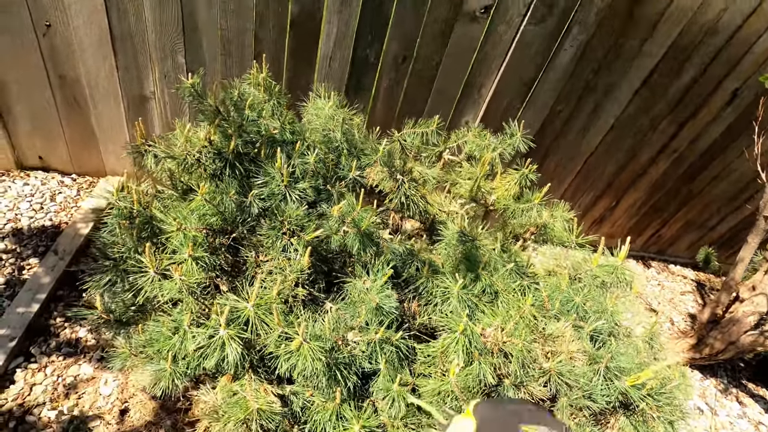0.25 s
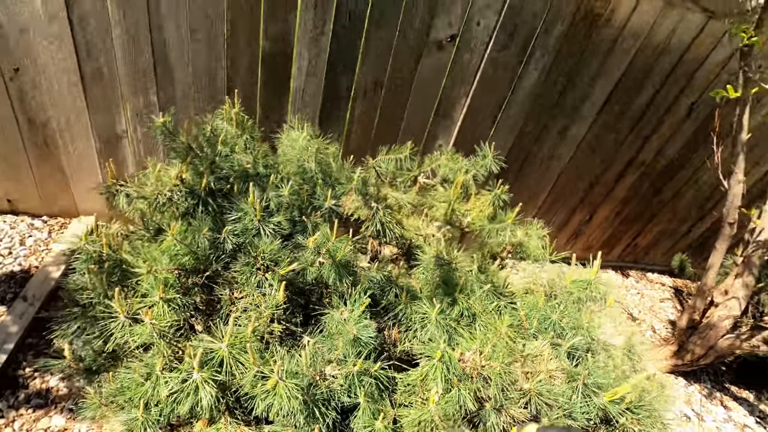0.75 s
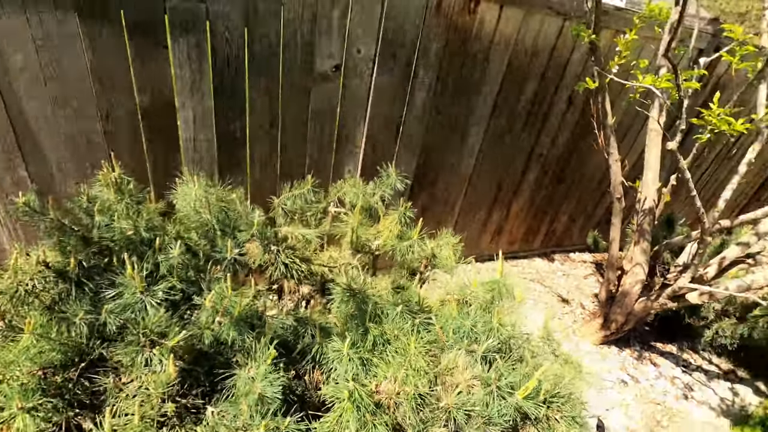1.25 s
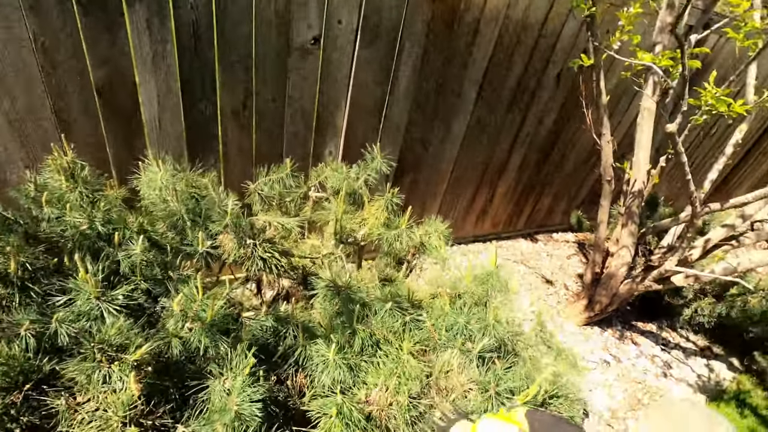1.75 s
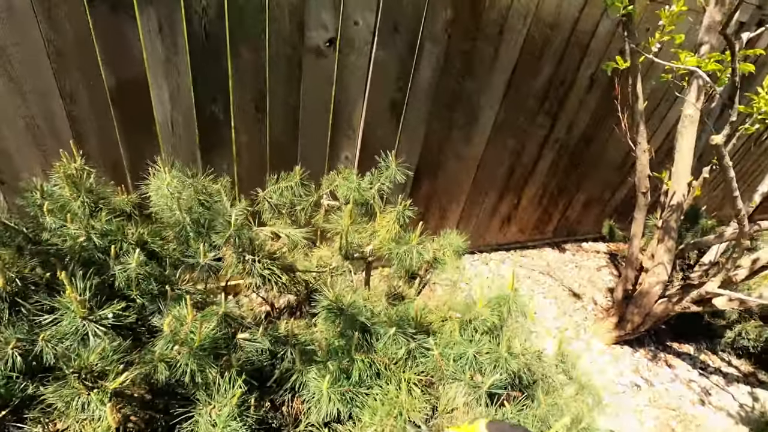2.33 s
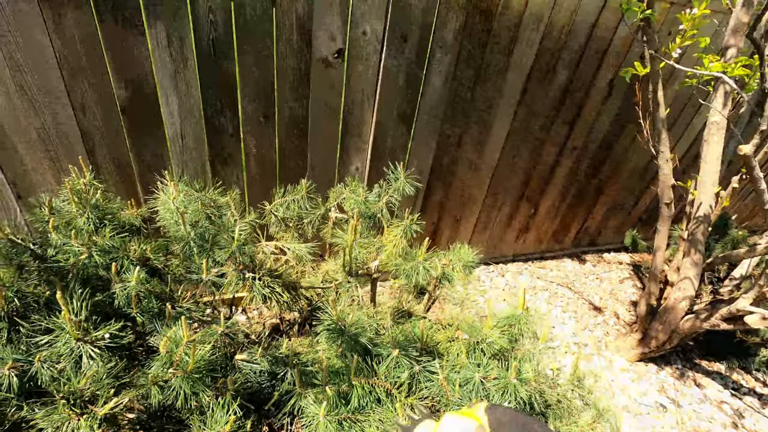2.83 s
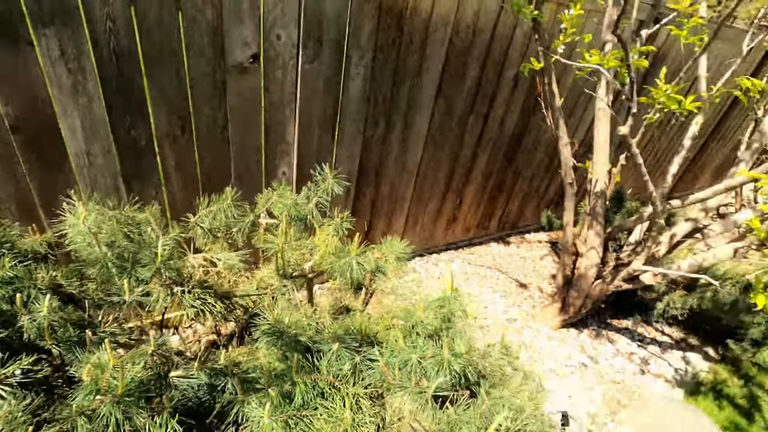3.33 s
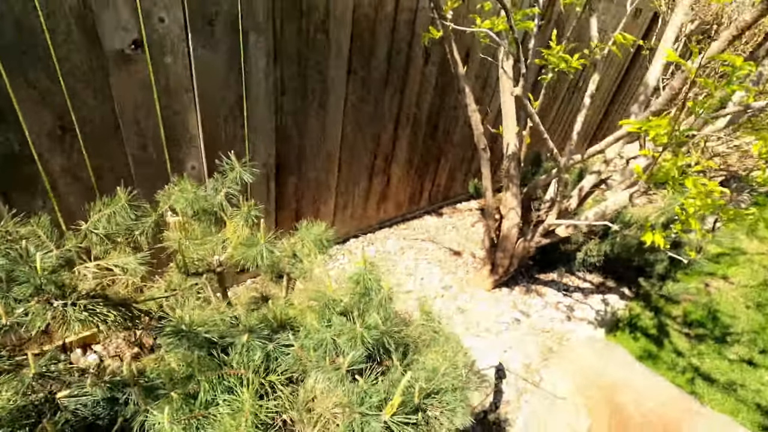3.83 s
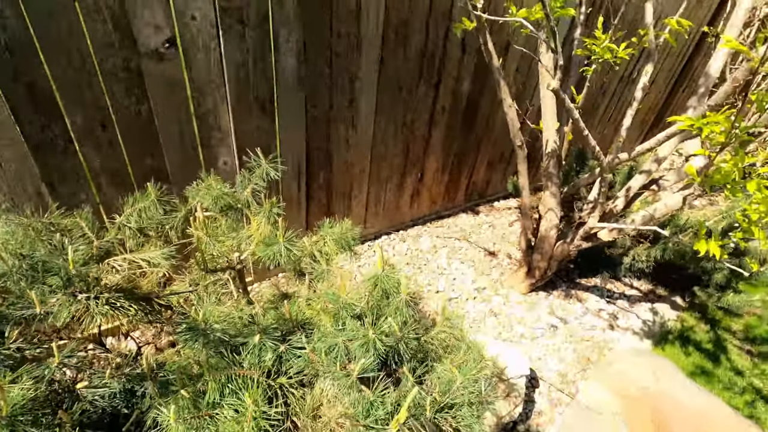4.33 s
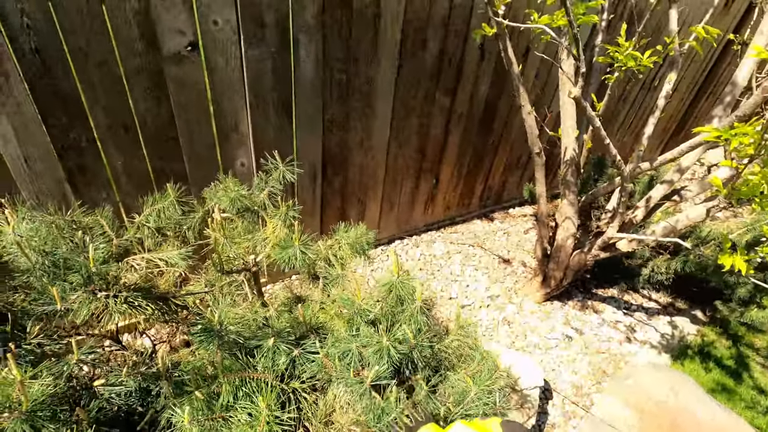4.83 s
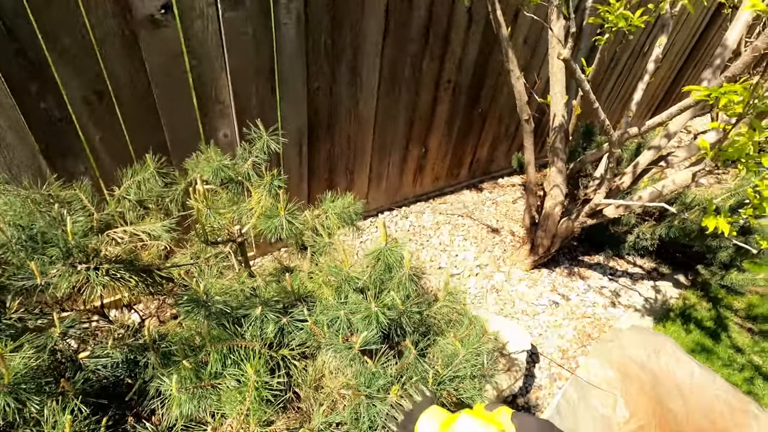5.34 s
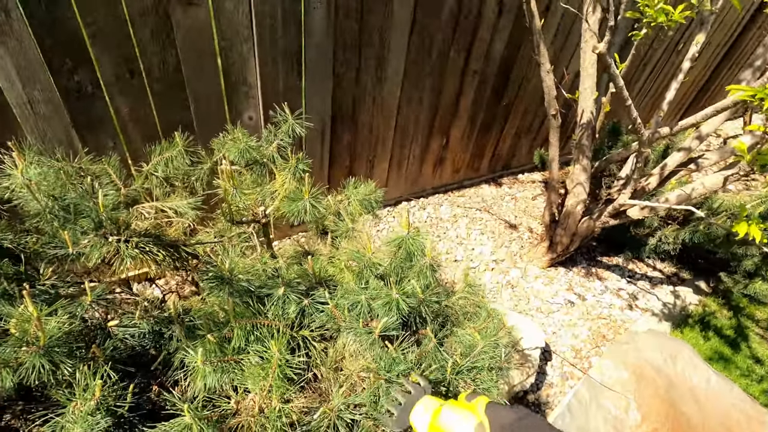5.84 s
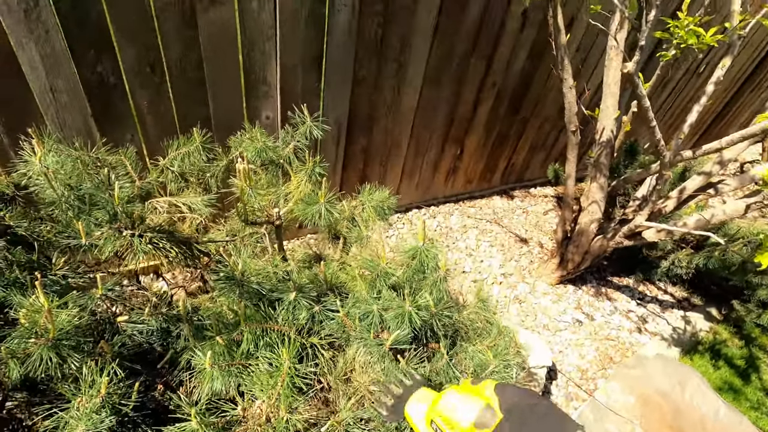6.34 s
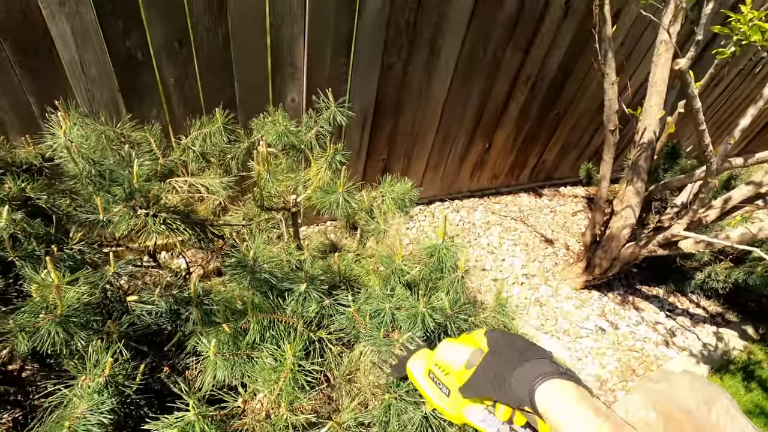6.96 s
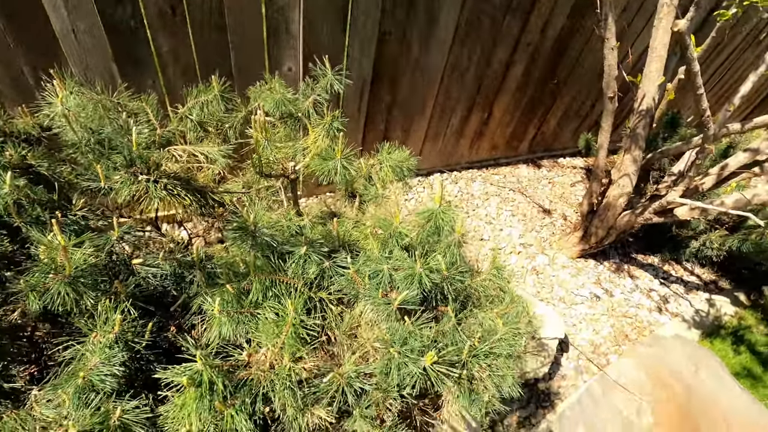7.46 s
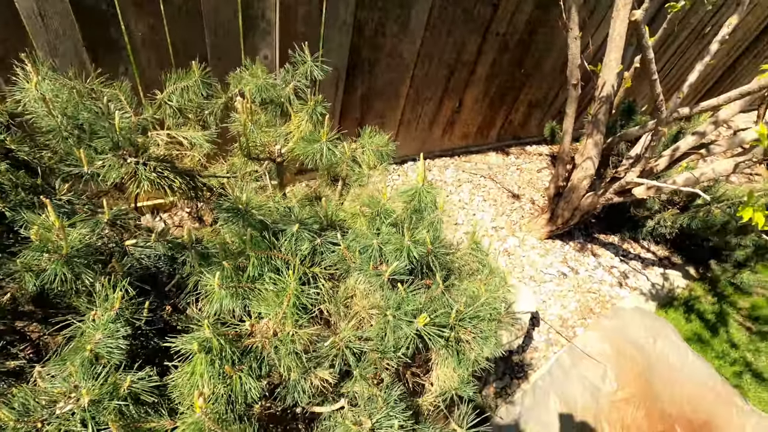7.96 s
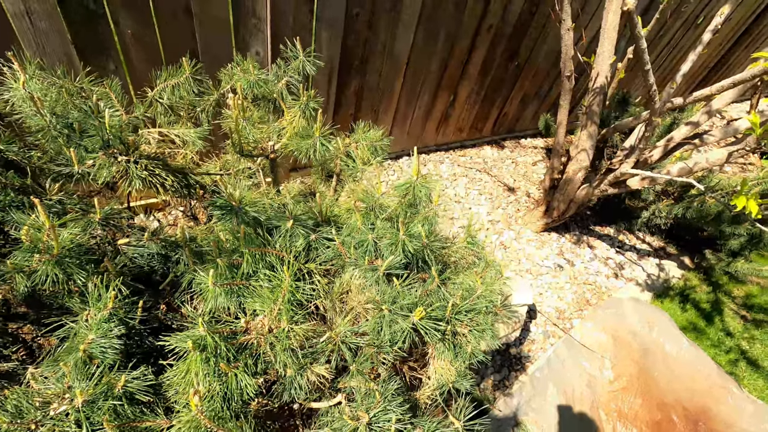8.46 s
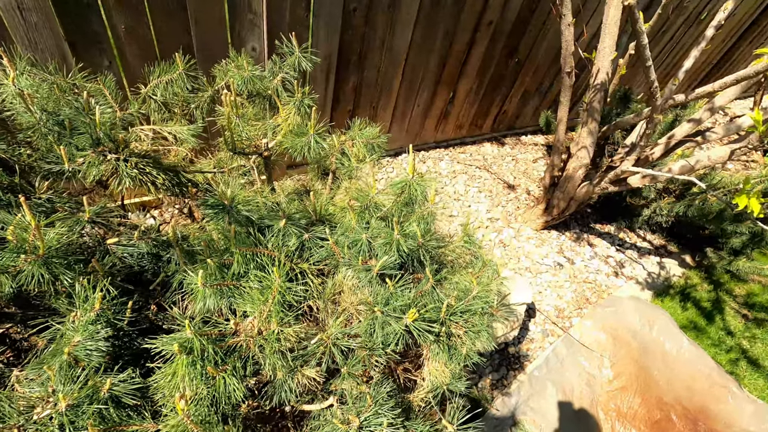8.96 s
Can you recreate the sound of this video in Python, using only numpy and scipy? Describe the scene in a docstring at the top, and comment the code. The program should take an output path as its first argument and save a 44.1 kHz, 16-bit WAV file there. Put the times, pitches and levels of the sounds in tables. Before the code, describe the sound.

Close electric garden shears trim a pine, starting and winding down five times with a buzzing plastic rattle and chattering steel blades.

```python
"""Cordless hedge shears, close to the microphone, trim a dwarf pine beside a wooden fence.
They run in five bursts that each coast to a stop. A small motor turns a crank; gear teeth and play
in the drive rattle the housing, and the blades scrape twice a turn. In the pauses the tool bumps,
needles rustle, and twigs and the trigger click. A dove coos across the garden; a far engine drones."""
import sys
import numpy as np
from scipy import signal
from scipy.fft import rfft, irfft, next_fast_len
from scipy.io import wavfile
from scipy.ndimage import uniform_filter1d

SR = 44100
rng = np.random.default_rng(int(sys.argv[2]) if len(sys.argv) > 2 else 0)


def file_out(sig):
    """Save sig as 16-bit WAV at sys.argv[1]."""
    # one column per channel
    cols = np.atleast_2d(sig).T
    # limit, then scale
    lim = np.clip(cols, -1, 1)
    pcm = np.round(lim * 32767).astype(np.int16)
    wavfile.write(sys.argv[1], SR, pcm)


N = 405719
TIME = np.arange(N) / SR
CRANK_HZ, GEAR_RATIO = 19.6, 15.15  # crank at full speed; motor turns per crank turn

# Spectrum of the steel blades. Each row: frequency in Hz, relative level in dB.
STEEL_SPECTRUM = [(3000, -21.5), (4200, -8), (4900, -3), (5400, -2.5), (6100, 1.5), (6550, -2), (7080, 2),
                  (7550, -8), (8150, -14), (10000, -9.5), (10900, -13), (12000, -18.5), (13200, -38),
                  (15200, -39)]


def undb(db):
    """Decibels to gain."""
    return 10 ** (np.asarray(db) / 20)


def unit(x):
    """Scale to rms 1."""
    return x / np.sqrt(np.mean(x ** 2) + 1e-18)


def running_unit(x, speed):
    """Scale to rms 1 over the time the drive runs above half speed."""
    return x / np.sqrt(np.mean(x[speed > .5] ** 2))


def curves(table):
    """Each column after the first (seconds) as a control over time."""
    times, *columns = np.transpose(table)
    return [np.interp(TIME, times, column) for column in columns]


def on_axis(points, hz):
    """Read (Hz, value) points on a log-frequency axis."""
    point_hz, value = np.transpose(points)
    return np.interp(np.log(hz + 1), np.log(point_hz), value)


def colour(x, points, resonances=(), size=4096):
    """Causal filter with the given (Hz, dB) spectrum, plus (Hz, dB, relative breadth) resonances."""
    hz = np.fft.rfftfreq(size, 1 / SR)
    peaks_db = sum(db * np.exp(-(np.log((hz + 1) / f) / breadth) ** 2) for f, db, breadth in resonances)
    cepstrum = irfft(np.log(undb(on_axis(points, hz) + peaks_db)))
    cepstrum[1:size // 2] *= 2  # fold to minimum phase
    cepstrum[size // 2 + 1:] = 0
    return signal.fftconvolve(x, irfft(np.exp(rfft(cepstrum))))[:N]


def mode(x, hz, width_hz):
    """One damped resonance."""
    return signal.lfilter(*signal.iirpeak(hz, hz / width_hz, SR), x)


def walk(rate):
    """Smooth random drift with spread 1, turning about rate times a second."""
    hold = max(int(SR / rate), 1)
    steps = np.repeat(rng.standard_normal(N // hold + 1), hold)
    return unit(uniform_filter1d(steps, hold)[:N])


def impulses(times, sizes):
    """Clicks at the given times, each shared between two samples."""
    place = np.clip(times * SR, 0, N)
    i, part = place.astype(int), place % 1
    return (np.bincount(i, sizes * (1 - part), N + 2) + np.bincount(i + 1, sizes * part, N + 2))[:N]


def grains(rate, spread_db):
    """Random tiny contacts of uneven size, about rate a second; the largest are bounded."""
    size = np.minimum(rng.standard_normal(N), 2.3)
    return (rng.random(N) < rate / SR) * rng.choice([-1, 1], N) * undb(spread_db * size)


def crank(on, off, stroke_s, coast_s, spin_up_s=.028, snag_s=6.42, snag_width_s=.05):
    """Speed (share of full) and turns: a quick spin-up, then after release friction slows the drive."""
    spin_up = 1 - np.exp(-np.maximum(TIME - on, 0) / spin_up_s)
    run_down = np.clip(1 - (TIME - off) / coast_s, 0, 1)
    snag = 1 - .14 * np.exp(-((TIME - snag_s) / snag_width_s) ** 2)
    speed = spin_up * run_down * snag
    turns = np.cumsum(speed) * CRANK_HZ / SR
    return speed, turns - np.interp(stroke_s, TIME, turns)


def effort(on, off, speed, run_db, rub_db, easing_db_per_s, bounce_speed=.51, db_per_halving=4):
    """Tool level and relative scrape in dB: a kick, a steady run, then both fall with the speed."""
    age = np.maximum(TIME - on, 0)
    kick_db = 5.5 * np.exp(-age / .067)  # the starting torque slams the gears
    coasting = np.where(TIME > off, np.maximum(speed, 1e-3), 1)
    # below bounce_speed the loose parts stop bouncing and the rattle dies
    bounce_db = -10 * np.log10(1 + (bounce_speed / coasting) ** 4.33)
    eased_db = easing_db_per_s * np.minimum(age, off - on)
    scrape_db = rub_db - kick_db - eased_db + db_per_halving * np.log2(coasting)
    return run_db + kick_db + bounce_db, scrape_db


def teeth(turns, jitter_ms=.11, scatter_db=3.0, count=91):
    """Each tooth knocks in its own way, nearly the same on every turn."""
    strength = rng.choice([-1, 1], count) * rng.uniform(.35, 1, count)
    offset = rng.random(count)
    tooth = np.arange(np.ceil(turns[0] * count), turns[-1] * count).astype(int)
    late, size = rng.standard_normal((N // 100, 2))[tooth].T
    times = np.interp((tooth + offset[tooth % count]) / count, turns, TIME)
    return impulses(times + late * jitter_ms / 1000, strength[tooth % count] * undb(scatter_db * size))


def buzz(x, t60):
    """After each contact the loose parts go on chattering briefly."""
    keep = np.exp(-2 * np.log(1000) / (t60 * SR))
    energy = signal.lfilter([1 - keep], [1, -keep], x ** 2)
    return np.sqrt(energy) * rng.standard_normal(N)


def drive_hits(speed, turns, loose_db=-5):
    """Gear teeth and loose parts strike as the drive takes up its play just ahead of each stroke."""
    angle = 2 * np.pi * turns
    stroke_db = .87 * np.cos(2 * angle + .37) + .89 * np.cos(angle + .84)
    shake_db = .99 * np.cos(GEAR_RATIO * angle) + .37 * walk(30)  # the motor shakes the drive
    gears = running_unit(teeth(turns), speed)
    loose = undb(loose_db) * running_unit(grains(4000 * speed, 2.2), speed)
    hits = (gears + loose) * undb((stroke_db + shake_db) * speed)
    return hits + .45 * buzz(hits, t60=.02)


def housing_rattle(hits, speed, resonances, soft_hz=3900):
    """The hits ring the plastic housing; slower contacts are softer, so the rattle dulls."""
    # Spectrum of the housing. Each row: frequency in Hz, relative level in dB.
    plastic_spectrum = [(250, -39.5), (450, -18.5), (600, -13), (780, -18), (950, -10), (1100, -8.5),
                        (1400, -5.5), (1650, -5), (1950, -9.5), (2350, -5), (3000, -7), (3600, -7),
                        (4300, -9.5), (5200, -19), (8000, -36)]
    rattle = running_unit(colour(hits, plastic_spectrum, resonances), speed)
    dull = signal.sosfiltfilt(signal.butter(4, soft_hz, fs=SR, output="sos"), rattle)
    rattle = dull + speed ** 2 * (rattle - dull)
    gear_case = mode(rattle, 2970, 370)  # its steel goes on ringing as the drive coasts
    return rattle * (1 - .043 * (1 - speed)) + .81 * (1 - speed) * gear_case


def drive_knock(hits, speed, knock_db=-22, slack_db=9):
    """The low knock of the hits stands out more as the drive slows and goes slack."""
    # Spectrum of the knock. Each row: frequency in Hz, relative level in dB.
    knock_spectrum = [(60, -34.5), (140, -17.5), (230, -10), (330, 1), (430, 1.5), (600, -4), (1200, -50)]
    return running_unit(colour(hits, knock_spectrum), speed) * undb(knock_db + slack_db * (1 - speed))


def blades(speed, turns, resonance, pattern_db=-2, ring_db=-7.5):
    """Teeth sliding over each other: a repeating chatter, loose grit and ringing steel."""
    # Parts of the blade that ring when a tooth catches.
    # Each row: frequency in Hz, width in Hz, relative level in dB.
    blade_modes = [(4920, 150, -4), (5800, 1200, -12), (7120, 570, -3), (9980, 490, -8.5),
                   (11900, 640, -14.5)]
    angle = 2 * np.pi * turns
    # they rub hardest in mid-stroke, forward more than back, and chatter eight times a turn
    stroke_db = 2.5 * np.cos(2 * angle) + .99 * np.cos(angle) + 1.35 * np.cos(3 * angle)
    chatter_db = 2.7 * np.cos(8 * angle) + .21 * walk(170)
    pressure = undb(speed * (stroke_db + chatter_db))
    grit = running_unit(grains(7000 * speed ** 2 + 250 * speed, 4.8), speed)
    pattern = undb(pattern_db) * running_unit(teeth(turns, count=32), speed)
    rubs = pressure * (grit + pattern)
    rubs = rubs + .82 * buzz(rubs, t60=.0033)
    scrape = running_unit(colour(rubs, STEEL_SPECTRUM, [resonance]), speed)
    rings = np.zeros(N)
    for hz, width_hz, db in blade_modes:
        catches = pressure * grains(1100 * speed, 4.0)
        rings += undb(db) * running_unit(mode(catches, hz, width_hz), speed)
    return running_unit(scrape + undb(ring_db) * rings, speed)


def motor_hum(speed, turns, motor_db=-26, wobble_rad=.029):
    """The uneven load makes the shaft wobble, which roughens the tones of the drive."""
    # Tones of the drive. Each row: multiple of the crank rate, relative level in dB.
    drive_tones = [(GEAR_RATIO, 0), (GEAR_RATIO + 2, -7), (26, -9), (50, -5), (58, -6)]
    shaft = 2 * np.pi * turns + wobble_rad * walk(25)
    hum = sum(undb(db + 2 * walk(9.8)) * np.sin(multiple * shaft) for multiple, db in drive_tones)
    return undb(motor_db) * np.sqrt(2) * speed ** 4 * hum


def burst(pull, grip):
    """One pull of the trigger: housing rattle, knock, blade scrape and motor hum."""
    on, off, stroke_s, coast_s, run_db, rub_db, easing_db_per_s = pull
    low, high, narrow, steel = np.reshape(grip, (-1, 2))
    speed, turns = crank(on, off, stroke_s, coast_s)
    level_db, scrape_db = effort(on, off, speed, run_db, rub_db, easing_db_per_s)
    hits = drive_hits(speed, turns)
    rattle = housing_rattle(hits, speed, [(*low, .13), (*high, .13), (*narrow, .06)])
    scrape = blades(speed, turns, (*steel, .11)) * undb(scrape_db)
    contacts = rattle + drive_knock(hits, speed) + scrape
    # a slow drive makes fewer contacts, each standing out more
    sparse_gain = np.where(TIME > off, 1 / np.sqrt(np.maximum(speed, .12)), 1)
    return (sparse_gain * contacts + motor_hum(speed, turns)) * undb(level_db)


def shears():
    """Five bursts at close range, each coloured by the way the tool is held."""
    # Trigger pulls. Each row: pull, release, moment of one forward stroke and coasting time in
    # seconds, running level in dB, scrape relative to it in dB, easing of the scrape in dB a second.
    pulls = [(-.2, .68, 0.023, .615, -18, -7.5, 1.6), (1.485, 3.142, 1.616, 0.68, -17.5, -5, 1.5),
             (3.675, 5.091, 3.78, .7, -18, -5, 0.5), (5.739, 7.039, 5.8372, .68, -18, -2.5, 4),
             (7.773, 9.3, 8.26, .66, -17.5, -5, 0.8)]
    # Resonances shifted by the grip, a row per burst. Each row: frequency in Hz and gain in dB for
    # the housing's low resonance, its high one, one narrow band and the blade ring.
    grips = [(1240, 7, 2920, 4.5, 1780, -2.5, 7400, 5), (1270, 5.5, 2910, 4, 1900, -3.5, 7300, 4.5),
             (1296, 5.5, 2970, 3.5, 2900, 1, 7100, 3.5), (1240, 4.5, 2750, 4.5, 984, 4, 4900, 4),
             (1580, 3.5, 3070, 3, 2670, -2, 7620, 9)]
    return sum(burst(pull, grip) for pull, grip in zip(pulls, grips))


def far_engine(tone_db=-.5, rumble_db=-52, rumble_follows=.36):
    """An engine wavers in the distance; its rumble swells less than its tone."""
    # Pitch of the drone. Each row: time in seconds, firing rate in Hz.
    firing_rates = [(0.0, 78.5), (0.51, 86.2), (1.02, 69.7), (1.46, 72.0), (2.87, 60.5), (6.71, 85.9),
                    (7.58, 84.8), (8.02, 72.9), (9.2, 70.2)]
    # Swell of the drone. Each row: time in seconds, level in dB.
    swells = [(0, -43), (.2, -57), (.45, -51), (.9, -66), (2.6, -65), (3.2, -50), (4.8, -47), (5.45, -60),
              (6.25, -41.5), (7.6, -45.5), (8, -60), (8.55, -60), (9, -42)]
    # Spectrum of the rumble. Each row: frequency in Hz, relative level in dB.
    rumble_spectrum = [(20, -17), (45, -12), (60, -2), (75, -5), (100, -11), (200, -25), (500, -72)]
    (hz,), (level_db,) = curves(firing_rates), curves(swells)
    phase = 2 * np.pi * np.cumsum(hz + 1.09 * walk(13)) / SR
    tone = np.sqrt(2) * np.sin(phase) * undb(level_db + tone_db + 1.4 * walk(15))
    rumble = unit(colour(rng.standard_normal(N), rumble_spectrum))
    return tone + rumble * undb(rumble_db + rumble_follows * (level_db - np.mean(level_db)))


def garden_air(air_db=-52, gust_db=-61, width=.79):
    """Faint outdoor air all round, and air moving unevenly past the two microphone ports."""
    # Spectrum of the open air. Each row: frequency in Hz, relative level in dB.
    air_spectrum = [(20, -21.5), (55, -7), (110, -11), (200, -7), (500, -4.5), (1200, -10), (3000, -16),
                    (7000, -20.5), (15000, -43)]
    # Spectrum of the air at the ports. Each row: frequency in Hz, relative level in dB.
    gust_spectrum = [(20, -4), (70, -4), (150, -14), (500, -45)]
    mid, side = (unit(colour(rng.standard_normal(N), air_spectrum)) * undb(air_db + walk(2.56))
                 for _ in range(2))
    gusts = unit(colour(rng.standard_normal(N), gust_spectrum)) * undb(gust_db + 2.1 * walk(3))
    return mid + (width * side + gusts) * np.array([[1], [-1]])


def bumps(decay_s=.014, width_hz=130):
    """The tool bumps dully in the hand and against the bush, ringing one low, damped resonance."""
    # Soft contacts. Each row: start in seconds, resonance in Hz, peak level in dB.
    contacts = [(0.798, 210, -36), (.965, 403, -24), (1.0, 780, -18), (1.028, 560, -24), (1.056, 244, -27),
                (7.423, 760, -21), (7.473, 486, -24)]
    out = np.zeros(N)
    for start, hz, db in contacts:
        fall = (TIME >= start) * np.exp(-np.abs(TIME - start) / decay_s)
        ring = mode(fall * rng.standard_normal(N), hz, width_hz)
        out += undb(db) * ring / np.abs(ring).max()
    return out


def needles(body_db=-1, crackle_db=-4):
    """Pine needles brush along the idle tool in a mass of tiny contacts."""
    # Course of the brushing. Each row: time in seconds, level in dB, treble relative to it in dB.
    brushing = [(1.255, -35, -14), (1.273, -38, -18), (1.281, -25, -28), (1.297, -35.5, -7),
                (1.327, -29.5, -7), (1.335, -40, -3), (1.475, -42, -4)]
    # Spectrum of the rustle's body. Each row: frequency in Hz, relative level in dB.
    rustle_spectrum = [(100, -15), (250, -8), (550, -4.5), (900, -4), (1400, -5), (2200, -8), (4000, -13),
                       (7000, -43)]
    level_db, treble_db = curves(brushing)
    touch = np.interp(TIME, [1.25, 1.262, 1.48, 1.5], [0, 1, 1, 0])
    body = unit(colour(grains(3000, 3.8), rustle_spectrum))
    crackle = unit(colour(grains(1600, 8.2), [(2500, -9), (4500, 10), (8000, 1), (15000, -37)]))
    return touch * undb(level_db) * (undb(body_db) * body + undb(crackle_db + treble_db) * crackle)


def clicks(click_db=-4, decay_s=.0031):
    """Twigs, blades and trigger give short dry snaps with a woody body and a bright edge."""
    # Snaps. Each row: start in seconds, relative level in dB, edge relative to the body in dB.
    snaps = [(1.28, -21, -20), (1.32, -31, -18), (1.357, -28, -14), (1.388, -34, 3), (1.404, -36, -26),
             (1.459, -37, -7), (5.715, -24, -28), (7.324, -29, -6), (7.459, -20, -1), (7.572, -24, -10),
             (7.63, -26.5, -14), (7.715, -23, -17.5)]
    # Spectrum of the woody body. Each row: frequency in Hz, relative level in dB.
    wood_spectrum = [(150, -21), (600, 7), (1300, 7), (2000, 1), (3500, -22), (6000, -33)]
    body, edge = np.zeros(N), np.zeros(N)
    for start, db, edge_db in snaps:
        fall = (TIME >= start) * np.exp(-np.abs(TIME - start) / decay_s)
        body += undb(db) * fall
        edge += undb(db + edge_db) * fall
    wood = unit(colour(rng.standard_normal(N), wood_spectrum))
    steel = unit(colour(rng.standard_normal(N), STEEL_SPECTRUM))
    return undb(click_db) * (body * wood + edge * steel)


def dove():
    """Soft, nearly pure coos from across the garden."""
    # Coos. Each row: start and length in seconds, first and last pitch in Hz, level in dB.
    coos = [(5.37, 0.069, 542, 570, -35.5), (5.539, 0.039, 550, 540, -34), (5.609, 0.028, 523, 525, -37),
            (5.709, 0.052, 548, 553, -34), (5.963, 0.33, 550, 518, -41.5)]
    out = np.zeros(N)
    for start, length, start_hz, end_hz, db in coos:
        progress = np.clip((TIME - start) / length, 0, 1)
        phase = 2 * np.pi * np.cumsum(start_hz + (end_hz - start_hz) * progress) / SR
        swell = np.sqrt(np.abs(np.sin(np.pi * progress)))
        out += np.sqrt(2) * undb(db) * swell * np.sin(phase)
    return out


def echoes(x, t60):
    """Dense decaying reflections that leave the colour and energy unchanged."""
    tail = rfft(rng.standard_normal(SR) * np.exp(-np.log(1000) * TIME[:SR] / t60))
    return signal.fftconvolve(x, irfft(tail / np.abs(tail))[:SR // 2])[:N]


def microphone(x, lag_s=3.7e-5, yard_db=-24, yard_t60=.25):
    """Close sound reaches the right port first; moving tool and needles scatter it differently to each."""
    # Scatter at the ports. Each row: frequency in Hz, scattered relative to direct sound in dB.
    scattering = [(300, -13.5), (1000, -11), (2500, -8), (5000, -5), (8000, -2), (13000, 3)]
    # The recorder's body shades its ports. Each row: frequency in Hz, left minus right in dB.
    shading = [(300, 0), (1200, 0.1), (3000, 1), (4200, 1), (5300, -4), (6300, -1), (7100, 1.8), (7900, 4),
               (9000, -11), (10300, -2.5), (11700, -5.5), (13500, -6), (15000, 2)]
    size = next_fast_len(N + SR // 10)
    hz = np.fft.rfftfreq(size, 1 / SR)
    share = undb(on_axis(scattering, hz))
    channels = []
    for side in (1, -1):  # left, right
        direct = rfft(x, size) * np.exp(-1j * np.pi * side * hz * lag_s)
        scattered = echoes(x, t60=.02) * np.sqrt(2) * np.sin(2 * walk(40))
        heard = (direct + share * rfft(scattered, size)) / np.sqrt(1 + share ** 2 / 2)
        shaded = irfft(heard * undb(side * on_axis(shading, hz) / 2), size)[:N]
        channels.append(shaded + undb(yard_db) * echoes(x, yard_t60))
    return np.array(channels)


def scene():
    """The shears and the bush close to the microphone, the garden behind."""
    close = shears() + needles() + clicks() + bumps()
    return microphone(close) + dove() + far_engine() + garden_air()


def record(dry, ceiling=.85, top_hz=15350):
    """The recorder rounds the highest peaks and cuts the top of the treble."""
    rounded = dry / (1 + (dry / ceiling) ** 6) ** (1 / 6)
    return signal.sosfilt(signal.ellip(10, .2, 80, top_hz, fs=SR, output="sos"), rounded)


dry = scene()
out = record(dry)
file_out(out)
```